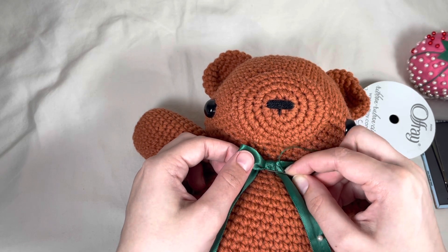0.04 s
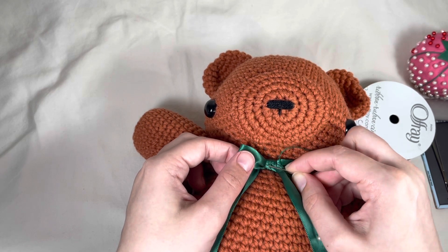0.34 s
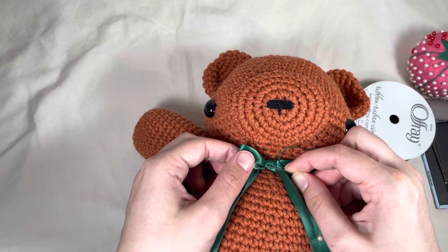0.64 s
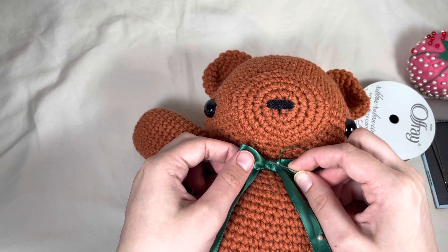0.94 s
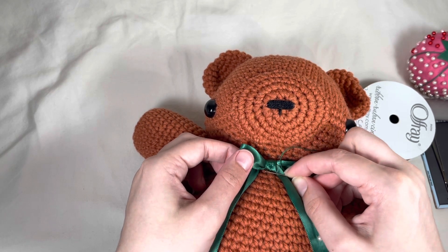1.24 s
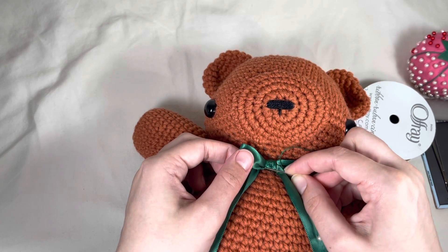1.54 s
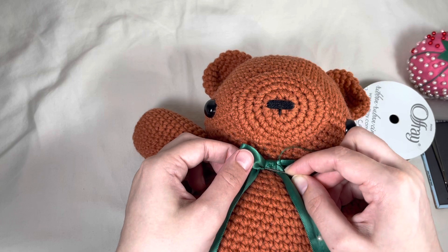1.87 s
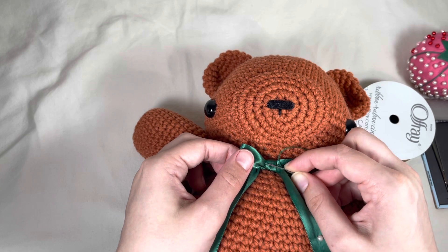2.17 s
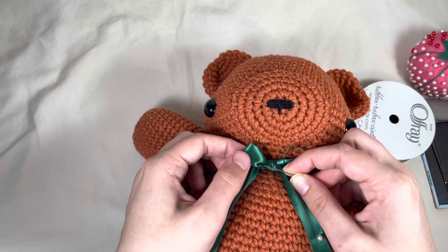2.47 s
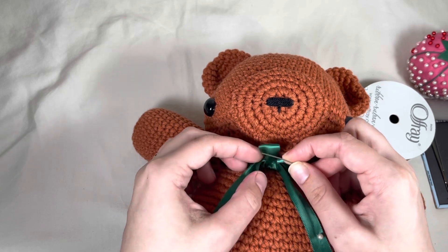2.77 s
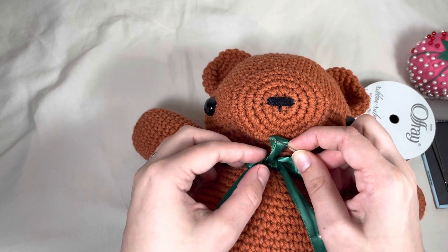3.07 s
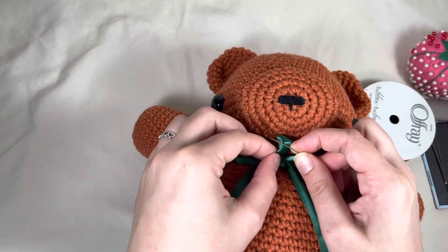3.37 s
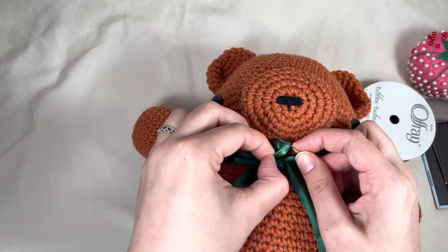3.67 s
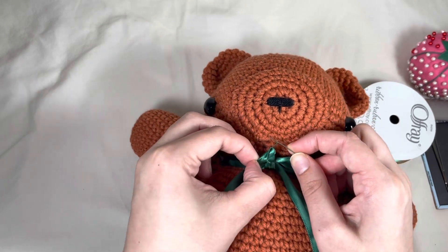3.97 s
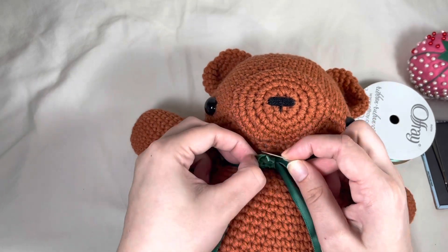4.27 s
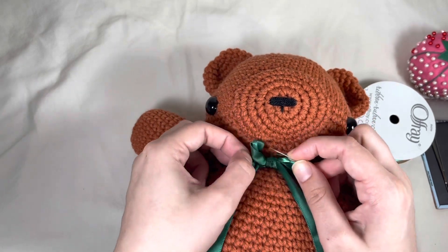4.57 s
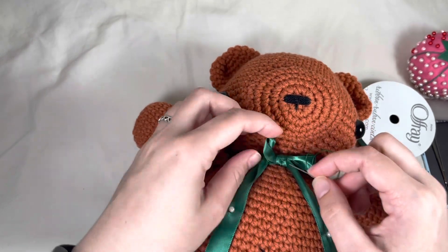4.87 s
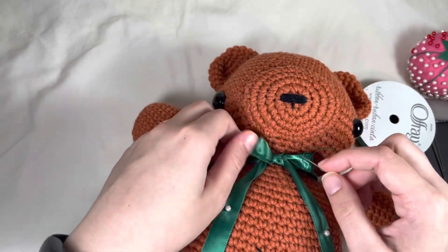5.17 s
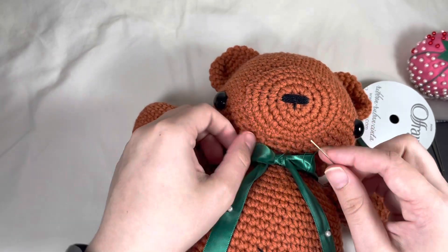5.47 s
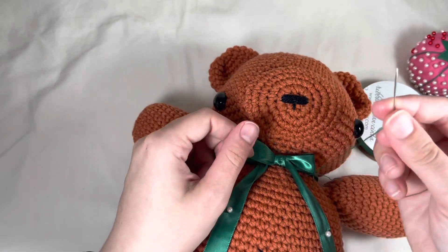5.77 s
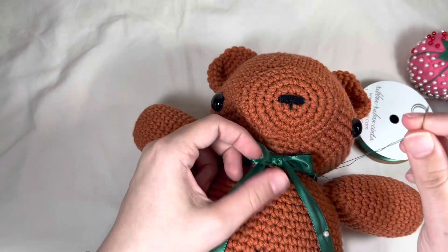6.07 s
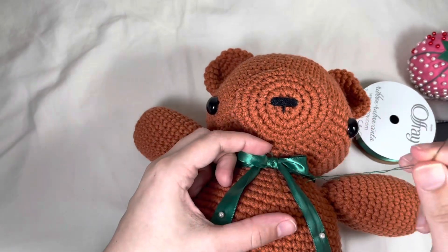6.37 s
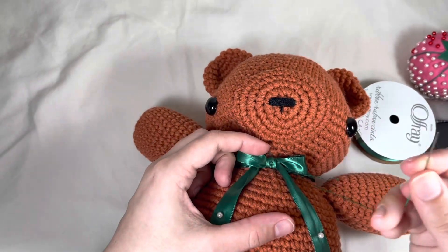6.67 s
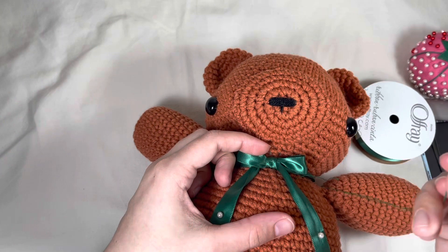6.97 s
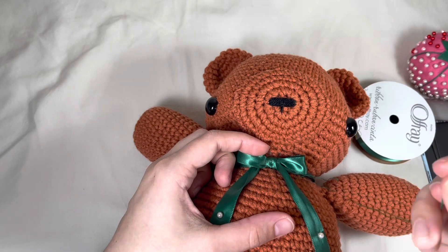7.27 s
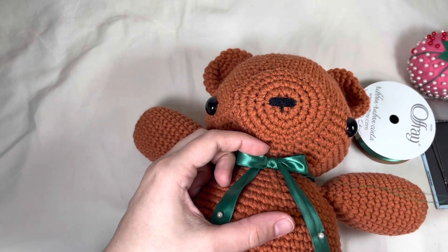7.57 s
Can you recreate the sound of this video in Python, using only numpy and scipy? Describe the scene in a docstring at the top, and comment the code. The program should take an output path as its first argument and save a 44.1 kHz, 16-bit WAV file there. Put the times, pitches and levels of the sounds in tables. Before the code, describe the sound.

A low fan hum and room rumble run steadily under faint, close sounds of hand sewing. A needle clicks through taut ribbon, fingers brush satin and yarn in short, light strokes, and a hand knocks softly on the table now and then. Toward the end the stuffed toy thuds gently, a thread pulls through the yarn with an uneven rasp, and another soft thud follows.

```python
"""Hands stitch a satin bow onto a crocheted bear, close to a small stereo recorder in a quiet room.
The needle ticks through taut ribbon; thread, satin and yarn rasp, hiss and rustle as their fibres slip.
Hand and bear knock on the table. Behind it all a slow fan hums, its blades throbbing softly
over the low rumble of the room."""
import sys
import numpy as np
from scipy import signal
from scipy.fft import rfft, irfft
from scipy.io import wavfile
from scipy.ndimage import map_coordinates

SR = 44100
rng = np.random.default_rng(int(sys.argv[2]) if len(sys.argv) > 2 else 0)


def to_wav(s):
    """Save 16-bit WAV."""
    ch = np.atleast_2d(s).T  # columns
    pcm = np.round(np.clip(ch, -1, 1) * 32767)  # PCM
    wavfile.write(sys.argv[1], SR, pcm.astype(np.int16))


N = 336776
TIME_S, FREQ_HZ = np.arange(N) / SR, np.fft.rfftfreq(N, 1 / SR)


def amp(db):
    """Decibels to gain."""
    return 10 ** (np.asarray(db) / 20)


def unit_rms(x):
    """Scale to rms 1."""
    return x / np.sqrt(np.mean(x ** 2) + 1e-30)


def log_curve(points):
    """Interpolate (f, value) points over all bins on a log-frequency axis."""
    hz, value = np.transpose(points)
    return np.interp(np.log(FREQ_HZ + 1), np.log(hz + 1), value)


def colour(x, spectrum):
    """Filter by a spectrum, with steep skirts beyond its ends."""
    low_cut = np.minimum(FREQ_HZ / spectrum[0][0], 1) ** 3
    high_cut = np.minimum(spectrum[-1][0] / (FREQ_HZ + 1), 1) ** 4
    return irfft(rfft(x) * amp(log_curve(spectrum)) * low_cut * high_cut, N)


def drift(rate_hz):
    """Slow random wander, rms 1."""
    return unit_rms(irfft(rfft(rng.standard_normal(N)) * np.exp(-(FREQ_HZ / rate_hz) ** 2), N))


def add(mix, start_s, sound):
    """Mix a sound in at start_s."""
    part = mix[:, max(round(start_s * SR), 0):][:, :sound.shape[-1]]
    part += sound[..., :part.shape[1]]


def fibre_slips(per_s, spread_db):
    """Tiny slips of fibre on fibre: random impulses of uneven size."""
    size = amp(spread_db * np.minimum(rng.exponential(1, N), 4))
    slipping = rng.random(N) < per_s / SR
    return unit_rms(size * slipping * rng.standard_normal((2, N)))


def early_echoes(x):
    """Nearby walls and furniture return nine faint echoes."""
    delays_s = rng.uniform(0.0036, 0.03, size=9)
    echoes = sum(rng.choice([-1, 1]) * np.pad(x, ((0, 0), (int(s * SR), 0)))[:, :N] for s in delays_s)
    return x + amp(-21) * echoes


# Room spectra: f/Hz, relative density/dB
RUMBLE_SPECTRUM = [(20, -26.5), (29, -10.5), (40, -1.5), (57, 3), (75, -1), (105, -2), (138, -2),
                   (190, -3.5), (220, -11.5), (280, -21), (420, -29)]
AIR_SPECTRUM = [(300, -2), (410, -6), (455, -16.5), (500, -7), (540, -11.5), (590, -8), (740, -17),
                (1080, -16.5), (1500, -28), (2200, -49), (4000, -38), (8500, -39.5), (11200, -36),
                (13000, -49)]

def room(rumble_db=-51.5, air_db=-66.5):
    """Low rumble, plus moving air in the room's resonances and hiss."""
    rumble, air = rng.standard_normal((2, 2, N))
    return (amp(rumble_db) * unit_rms(colour(rumble, RUMBLE_SPECTRUM))
            + amp(air_db) * unit_rms(colour(air, AIR_SPECTRUM)))


# Motor tones: f/Hz, rms level/dB, unsteady share of the tone
MOTOR_TONES = [(56.25, -63, 0.94), (115.5, -63.5, 1), (120.25, -47, 0.3), (154.8, -60.5, 0.8),
               (241.8, -70.5, 0.66)]

def fan_hum():
    """Mains and motor tones, each wavering in level and phase."""
    out = np.zeros(N)
    for hz, db, unsteady in MOTOR_TONES:
        waver = 1 + unsteady * (drift(rate_hz=6.5) + 1j * drift(rate_hz=2.2)) / np.sqrt(2)
        tone = np.exp(2j * np.pi * (hz * TIME_S + rng.random()))
        out += amp(db) * unit_rms((waver * tone).real)
    return out


# Blade turbulence: f/Hz, relative density/dB
WHOOSH_SPECTRUM = [(165, -0.5), (195, 5.5), (215, -6.5), (238, -3), (270, 1.5), (293, -8.5), (312, -7.5),
                   (355, -11), (420, -28.5)]
# Throbs at two rates and their sum: f/Hz, first crest t/s, relative depth
BLADE_THROBS = [ (3.52, .053, 2.4), (4.215, .077, 2.2), (7.735, .069, 1.4), ]

def fan_blades(level_db=-61, depth_scale_db=1.41):
    """Low turbulence swells and sinks as the throbs move in and out of step."""
    throb = sum(depth * np.cos(2 * np.pi * hz * (TIME_S - crest_s))
                for hz, crest_s, depth in BLADE_THROBS)
    whoosh = unit_rms(colour(rng.standard_normal((2, N)), WHOOSH_SPECTRUM))
    return amp(level_db + depth_scale_db * throb) * whoosh


# Table modes: f/Hz, relative level/dB, t60/s
TABLE_MODES = [(502, 0, 0.031), (623, 4, 0.024), (778, -10, 0.041), (1065, -3.5, 0.017)]
# Hand against things on the table: t/s, level/dB
HAND_KNOCKS = [(0.7183, -59), (0.742, -56.5), (0.9112, -41.5), (3.534, -58.5), (4.332, -50.5), (4.389, -45)]

def table_knocks(attack_s=0.00047):
    """The hand excites the table's cloth-damped modes."""
    out, t = np.zeros((2, N)), np.arange(8192) / SR
    ring = sum(amp(db - 60 * t / t60_s) * np.sin(2 * np.pi * hz * t) for hz, db, t60_s in TABLE_MODES)
    attack = 1 - np.exp(-t / attack_s)
    for start_s, db in HAND_KNOCKS:
        add(out, start_s, amp(db) * ring * attack)
    return out


# Bear against the table: t/s, level/dB
BODY_BUMPS = [(.149, -41), (6.267, -33.5), (7.331, -33.5)]

def bear_bumps(body_hz=104.6, rise_s=0.0047, push_lag_s=0.0146, push_gain_db=7):
    """The stuffed body thuds softly on the table and gives way after each knock."""
    out, t = np.zeros((2, N)), np.arange(8192) / SR
    thud = t / rise_s * np.exp(1 - t / rise_s) * np.sin(2 * np.pi * body_hz * t)
    pushes = [(knock_s + push_lag_s, db + push_gain_db) for knock_s, db in HAND_KNOCKS]
    for start_s, db in list(BODY_BUMPS) + pushes:
        add(out, start_s, amp(db) * thud)
    return out


# Fine fibres and satin threads: f/Hz, relative density/dB
FIZZ_SPECTRUM = [(7500, -29), (9300, -3), (10300, 6), (11400, 5), (12200, -12), (13500, -23)]

def stray_fibres(level_db=-93):
    """Stray fibres crackle faintly even under resting fingers."""
    gain = amp(level_db + 2 * drift(rate_hz=8))
    return gain * unit_rms(colour(fibre_slips(per_s=680, spread_db=1.5), FIZZ_SPECTRUM))


# Fingers on yarn: centre t/s, length/s, level/dB
YARN_BRUSHES = [(3.11, 0.25, -78.5), (4.07, 0.024, -90), (5.035, 0.063, -82), (5.5, 0.17, -78.5),
                (5.735, 0.067, -68), (6.18, 0.2, -75.5), (6.56, 0.081, -80)]
# Ribbon and thread in the fingers: centre t/s, length/s, relative level/dB, lightness/dB, bite/dB
RIBBON_SLIDES = [(1.796, 0.024, -84, 4.5, 2), (2.43, 0.083, -81, 6, -3), (2.523, 0.054, -76, 6.5, 5),
                 (2.69, 0.043, -74, -1, 2), (3.135, 0.076, -80.5, -1, 8), (3.256, 0.029, -72, 3.5, 2),
                 (3.421, 0.066, -77, 2.5, 2), (3.785, 0.067, -91, 3, 0), (4.165, 0.11, -86, 2, 5),
                 (4.35, 0.099, -94, 14, 1), (4.54, 0.063, -78.5, 2.5, 1), (4.874, 0.12, -74, .5, 1.5),
                 (5.04, 0.063, -73, 2, 6), (5.159, 0.044, -80.5, 7.5, 3), (5.452, 0.063, -83.5, 0.5, 11),
                 (5.738, 0.033, -95, 6, 8), (6.173, 0.11, -77, 1, 1.5), (7.255, 0.063, -94, 1, 0),
                 (7.35, 0.029, -89, 2.5, 0), (7.563, 0.038, -88.5, 2, 0)]

def finger_strokes(skid_lag_s=0.0066, skid_s=0.024):
    """Strokes as (centre t/s, length/s, yarn/dB, drag/dB, fizz/dB, bite/dB); bite is start over end."""
    # A finger skids over the yarn after each knock.
    skids = [(knock_s + skid_lag_s, skid_s, db - 28) for knock_s, db in HAND_KNOCKS]
    brushes = [(centre_s, length_s, db, db - 18, db - 14, 0)
               for centre_s, length_s, db in list(YARN_BRUSHES) + skids]
    # A light touch fizzes, a firm one drags.
    slides = [(centre_s, length_s, db - 0.5, db - light_db, db + light_db, bite_db)
              for centre_s, length_s, db, light_db, bite_db in RIBBON_SLIDES]
    return brushes + slides


# Friction spectra: f/Hz, relative density/dB
YARN_SPECTRUM = [(500, 2), (800, -2), (1100, 0.5), (1500, -8), (2100, -8), (2800, -12), (3600, -17.5),
                 (4800, -17), (6000, -22.5), (7500, -20)]
RIBBON_DRAG_SPECTRUM = [(2500, -8), (4500, -3), (5900, -1), (7000, -7.5), (8200, 4), (9500, -15),
                        (11000, -18)]
# Palms shifting on yarn: t/s, relative level/dB
PALM_ENVELOPE = [(0.0, -84.5), (1.78, -83.5), (2.43, -80), (3.3, -78), (3.7, -82.5), (4.36, -75),
                 (4.97, -76.5), (5.19, -85.5), (6.52, -86), (7.6, -84.5)]

def rubbing(half_window=8192):
    """Coarse yarn, dragged ribbon and fine satin threads catch and let go under one grip."""
    grip = amp(1.4 * drift(rate_hz=40))
    yarn = grip * unit_rms(colour(fibre_slips(per_s=6000, spread_db=-1.5), YARN_SPECTRUM))
    drag = grip * unit_rms(colour(fibre_slips(per_s=12000, spread_db=2), RIBBON_DRAG_SPECTRUM))
    fizz = grip * unit_rms(colour(fibre_slips(per_s=5300, spread_db=2.5), FIZZ_SPECTRUM))
    out = yarn * amp(3.5 + np.interp(TIME_S, *np.transpose(PALM_ENVELOPE)))
    for centre_s, length_s, yarn_db, drag_db, fizz_db, bite_db in finger_strokes():
        centre = round(centre_s * SR)
        part = slice(centre - half_window, centre + half_window)
        along = 2 * (TIME_S[part] - centre_s) / length_s
        steepness = np.where(along < 0, 10, 5.6)  # abrupt start, gentler stop
        bite = amp(-bite_db * np.clip(along, -1, 1) / 2)
        speed = bite / np.sqrt(1 + np.abs(along) ** steepness)
        ribbon = amp(drag_db + 7) * drag[:, part] + amp(fizz_db + 3.5) * fizz[:, part]
        add(out, part.start / SR, speed * (amp(yarn_db) * yarn[:, part] + ribbon))
    return out


# Thread and yarn over the weave: centre t/s, length/s, f/Hz, width/Hz, level/dB, glide/octaves
SHORT_PULLS = [(0.272, 0.051, 4600, 855, -78.5, 0), (0.956, 0.0596, 1930, 700, -76.5, -0.404),
               (1.237, 0.081, 3270, 1500, -82, .3), (1.395, 0.047, 4580, 750, -77, 0.12),
               (1.799, 0.06, 4500, 1200, -79, -0.27), (2.413, .16, 2990, 1800, -76, .2),
               (2.693, 0.033, 8140, 3130, -54, -0.23), (2.776, 0.096, 5400, 950, -75, -0.11),
               (2.788, 0.083, 3830, 2620, -73, 0.037), (3.041, .22, 1674, 550, -79.5, 0.39),
               (3.103, 0.268, 570, 300, -67, .2), (5.736, 0.087, 1090, 300, -63.5, 0.064)]

def thread_pulls():
    """Each pull is a run of slips around one pitch that glides with the pull's speed."""
    out, slips = np.zeros((2, N)), fibre_slips(per_s=8000, spread_db=4)
    for centre_s, length_s, hz, width_hz, db, octaves in SHORT_PULLS:
        start_s, n = max(centre_s - length_s / 2, 0), int(length_s * SR)
        along = np.arange(n) / n
        band = np.exp(-2 * ((np.fft.rfftfreq(n, 1 / SR) - hz) / width_hz) ** 2)
        rasp = irfft(rfft(slips[:, int(start_s * SR):][:, :n]) * band, n)
        shift_hz = hz * (2 ** (octaves * (along - 0.5)) - 1)
        gliding = (signal.hilbert(rasp) * np.exp(2j * np.pi * np.cumsum(shift_hz) / SR)).real
        add(out, start_s, amp(db) * unit_rms(gliding) * np.sin(np.pi * along))
    return out


# Surges of the arm: t/s, level/dB
DRAW_ENVELOPE = [(6.4, -96), (6.56, -71.5), (6.62, -77), (6.68, -69), (6.75, -66), (6.84, -93), (6.91, -67),
                 (6.98, -73.5), (7.06, -98), (7.11, -66.5), (7.145, -62), (7.18, -88)]
# Drawn thread: f/Hz, relative density/dB
THREAD_SPECTRUM = [(520, 8.5), (800, 1.5), (1100, 5.5), (1550, -5.5), (2150, -5), (3100, -12.5),
                   (4600, -17.5), (5800, -12), (7000, -19.5), (11000, -17)]

def thread_draw():
    """The whole thread runs through the yarn: one unbroken rasp that swells and catches."""
    surge = amp(np.interp(TIME_S, *np.transpose(DRAW_ENVELOPE), left=-np.inf, right=-np.inf))
    catching = amp(1.2 * drift(rate_hz=45))
    rasp = unit_rms(colour(fibre_slips(per_s=3900, spread_db=-0.5), THREAD_SPECTRUM))
    return surge * catching * rasp


# Needle ticks: t/s, relative level/dB, tilt/(dB/octave), decay/s
NEEDLE_TICKS = [(0.718, -37.5, -3.5, 0.00064), (0.7402, -36, -4, 0.001), (0.911, -37.5, -0.5, 0.0014),
                (1.3282, -58, -6, 0.0015), (1.651, -51.5, -8, 0.0011), (2.7945, -47, -8, 0.00041),
                (2.868, -59, -11, 0.0033), (2.889, -56.5, -5, 0.003), (3.3166, -50.5, 0.5, 0.00098),
                (3.5358, -44, -10.5, 0.00047), (3.555, -62, -7, 0.0048), (4.331, -42.5, -1.5, .0011),
                (4.388, -45, -7.5, 0.0063), (5.012, -48, 3.5, .0039), (5.0397, -37.5, -3, 0.00094),
                (5.087, -46, -10, 0.00044), (6.45, -69, 5.5, 0.0025)]
# Tick colour: f/Hz, gain/dB
TICK_SPECTRUM = [(1000, -12.5), (2100, -4), (3000, -2), (4000, -5), (5100, -4), (5900, 0), (6600, -8),
                 (7900, 4), (9300, 2.5), (10700, 8.5), (11400, -0.5), (12600, -26)]

def needle(lead_s=0.01, pivot_hz=5000):
    """The needle pierces taut ribbon or meets a fingernail: short catch, dry snap, faint room tail."""
    out, t = np.zeros((2, N)), np.arange(8192) / SR - lead_s
    hz = np.fft.rfftfreq(len(t), 1 / SR)
    octaves = np.clip(np.log2((hz + 1) / pivot_hz), -1, 1)
    before_s, after_s = np.minimum(t, 0), np.maximum(t, 0)
    tail = amp(-27.5) * np.exp(before_s / 0.00098 - after_s / 0.017)
    for tick_s, db, tilt_db, decay_s in NEEDLE_TICKS:
        burst = amp(-3) * np.exp(before_s / 0.00016 - after_s / decay_s)
        tick = rng.standard_normal((2, len(t))) * (burst + tail)
        tick[:, round(lead_s * SR)] += amp(2.5) * np.array([1, rng.uniform(-1.4, 1)])  # clean snap
        add(out, tick_s - lead_s, irfft(rfft(tick) * amp(db + tilt_db * octaves)))
    return colour(out, TICK_SPECTRUM)


def shifting_contact(x, depth_db, span_hz, span_s):
    """Changing contact makes random spectral peaks and dips come and go."""
    hz, t, spectra = signal.stft(x, SR)
    grid = np.meshgrid(hz / span_hz, t / span_s, indexing="ij")
    ripple = map_coordinates(rng.standard_normal(spectra.shape[1:]), grid, order=1, mode="wrap")
    gain = unit_rms(amp(depth_db * np.clip(ripple, -2, 2)))
    return signal.istft(spectra * gain, SR)[1][:, :N]


# Phase between ports: f/Hz, left lead/rad
MIC_PHASE = [(400, 0), (850, -3), (1200, -3.2), (1600, -.1), (4000, .8), (4900, 3.1), (5700, 6.2),
             (6200, 6.35), (8500, 9.35), (9400, 9.5), (12000, 12.57)]
# Likeness of ports: f/Hz, coherence
MIC_COHERENCE = [(220, 1), (350, .7), (600, .25), (1100, .25), (1700, .88), (4300, .68), (5900, .97),
                 (7500, .85), (9000, .999), (10500, .91)]

def microphone_ports(pair):
    """Two uncorrelated channels become the partly coherent pickup of two close ports."""
    left, other = rfft(pair)
    coherence = np.clip(log_curve(MIC_COHERENCE), -1, 1)
    lag = np.exp(-1j * np.interp(FREQ_HZ, *np.transpose(MIC_PHASE)))
    right = lag * (coherence * left + np.sqrt(1 - coherence ** 2) * other)
    return irfft(np.array([left, right]), N)


def scene():
    """Hands close by, fan and room behind."""
    friction = rubbing() + stray_fibres() + thread_pulls() + thread_draw()
    hands = shifting_contact(early_echoes(friction) + needle(), depth_db=2.6, span_hz=400, span_s=0.03)
    return microphone_ports(room() + fan_blades() + hands) + fan_hum() + table_knocks() + bear_bumps()


# Port balance: f/Hz, left minus right/dB
MIC_BALANCE = [(150, 0.32), (350, 4.5), (700, 2.5), (1200, 2), (2200, 0)]

def record(dry):
    """The left port favours the low mids; a low-pass limits the band."""
    lean_db = log_curve(MIC_BALANCE) / 2
    heard = irfft(rfft(dry) * amp([lean_db, -lean_db]), N)
    low_pass = signal.firwin(255, cutoff=13100, window=("kaiser", 8), fs=SR)
    return signal.oaconvolve(heard, low_pass[None], "same")


dry = scene()
out = record(dry)
to_wav(out)
```